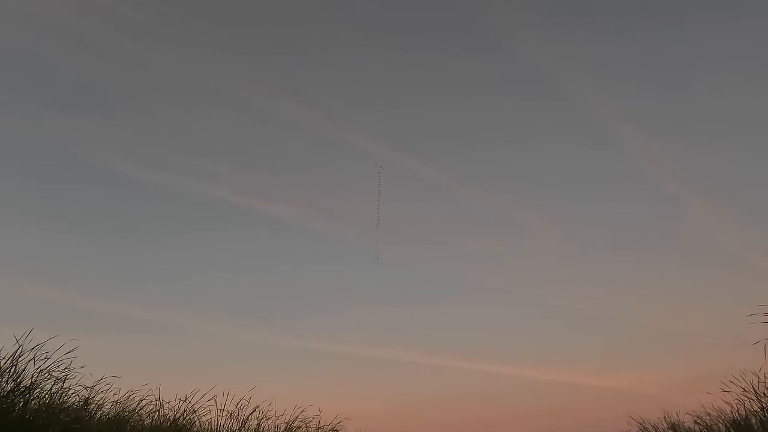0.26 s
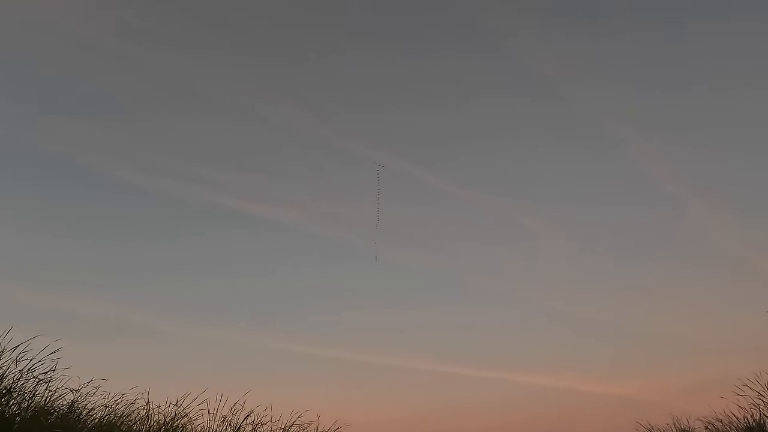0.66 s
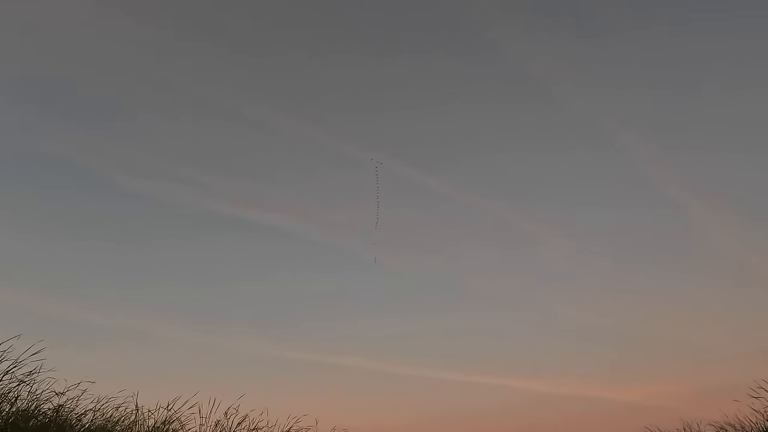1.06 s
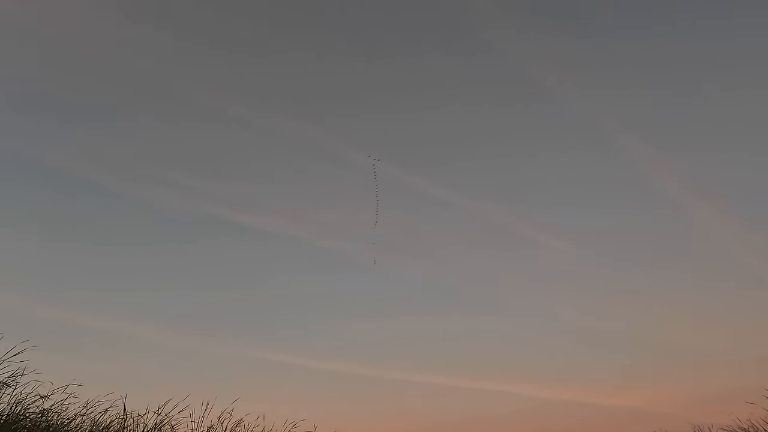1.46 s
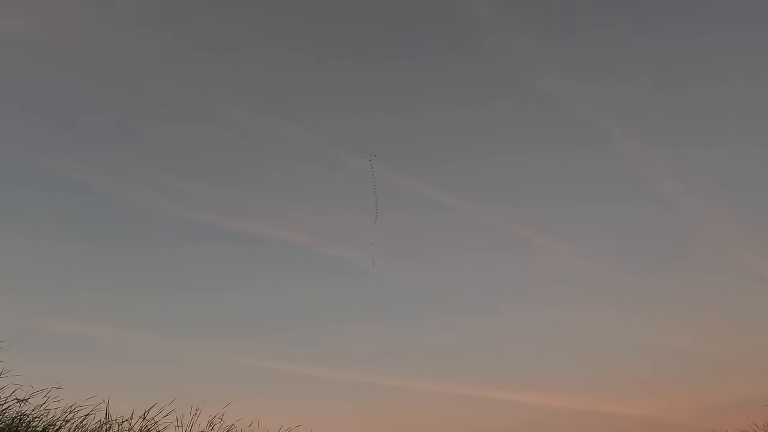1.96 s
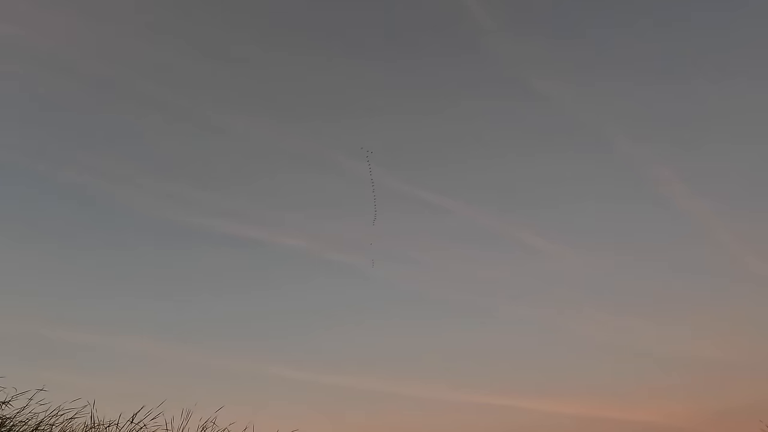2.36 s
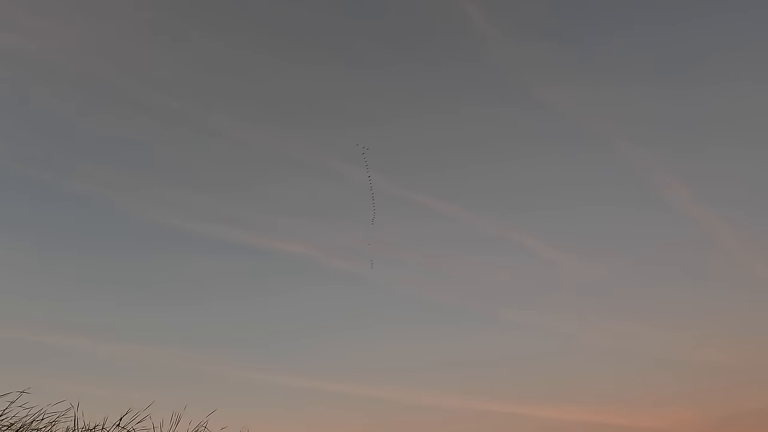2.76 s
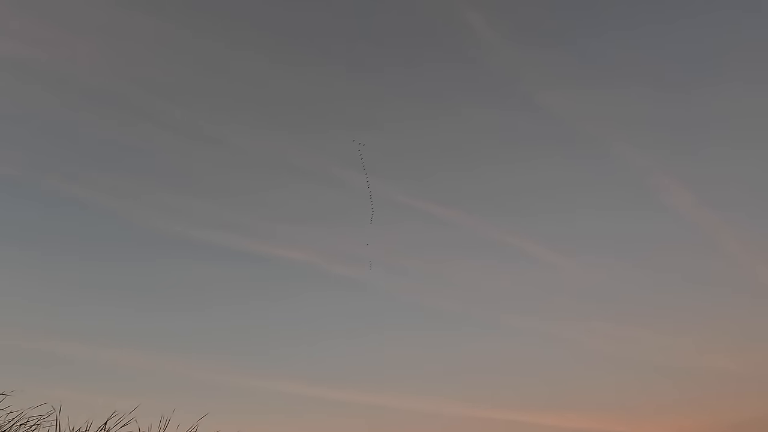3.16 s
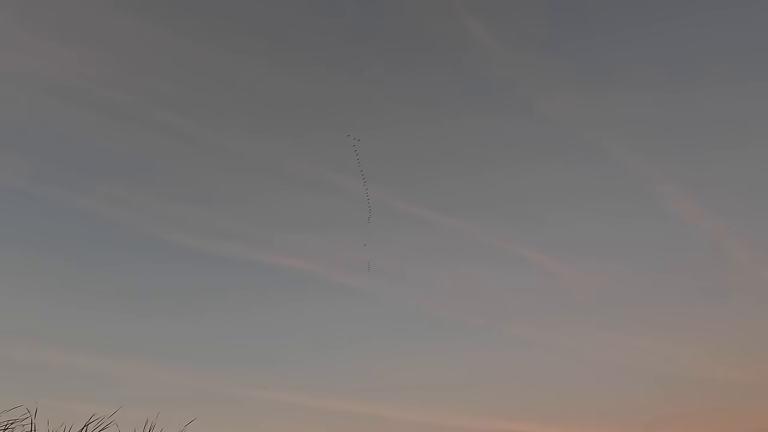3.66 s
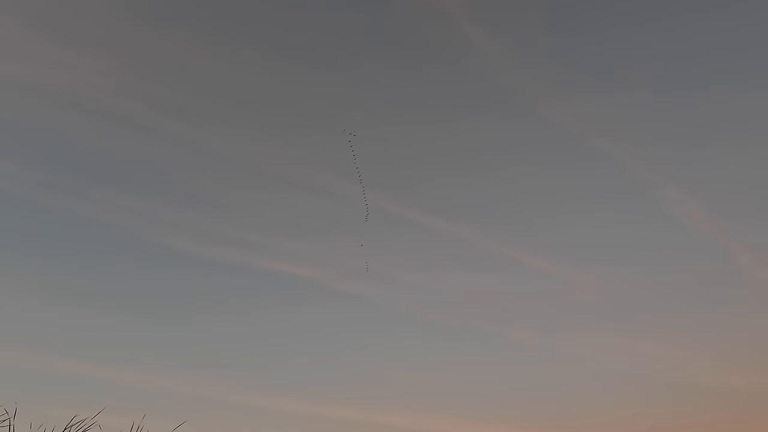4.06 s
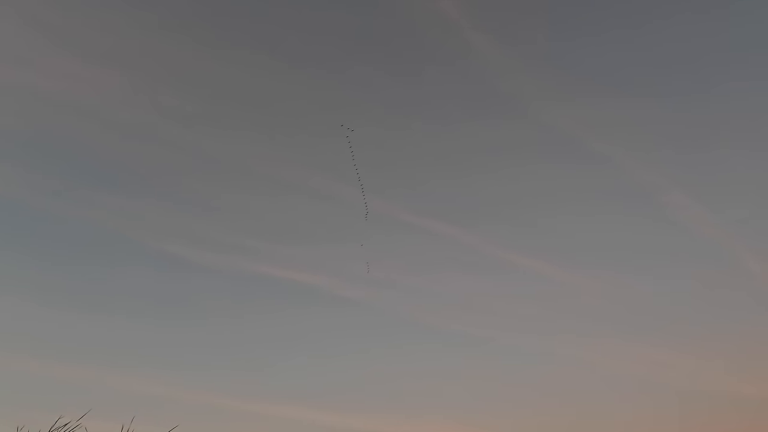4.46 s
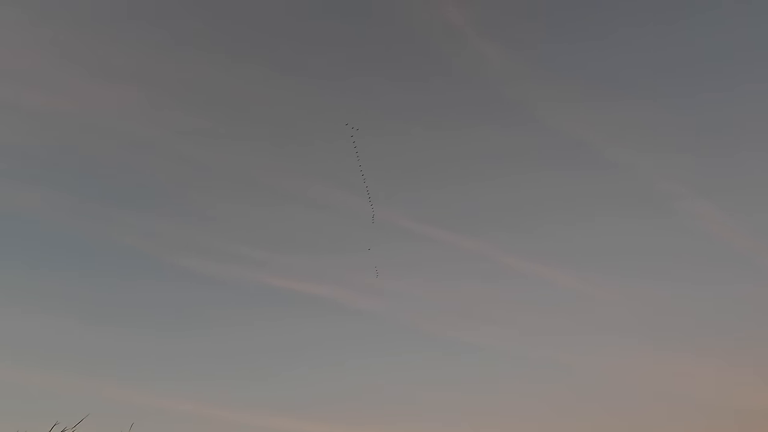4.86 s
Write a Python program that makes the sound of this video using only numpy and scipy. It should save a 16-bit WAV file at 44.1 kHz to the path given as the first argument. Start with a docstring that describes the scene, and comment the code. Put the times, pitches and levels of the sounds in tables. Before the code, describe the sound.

Short, raspy goose honks pass overhead, over a steady wind rumble, soft reed hiss and faraway cackling.

```python
"""Geese pass high over a marsh; wind rumbles on the microphone, more on the right, over reed hiss.
From the start far birds cackle and grass stems tick. Near 0.5 s one goose begins four honks, a second
apart, each cracking at its top; gusts slap the microphone until 0.8 s. Then other geese overlap, each
syrinx breaking from a rasp into a clear arched note and back. From 2 s they honk singly, and near 4.5 s
two overlap. Far cackles and wind end the scene."""
import sys
import numpy as np
from scipy import signal
from scipy.fft import rfft, irfft, next_fast_len
from scipy.io import wavfile
from scipy.ndimage import uniform_filter1d

SR = 44100
rng = np.random.default_rng(int(sys.argv[2]) if len(sys.argv) > 2 else 0)


def unload_audio(sound):
    """Save the sound as a 16-bit wav file, at the path given as the first command line argument."""
    columns = np.transpose(np.atleast_2d(sound))
    # keep every value between -1 and 1, then stretch to whole-number steps
    steps = np.round(np.clip(columns, -1, 1) * 32767)
    wavfile.write(sys.argv[1], SR, steps.astype(np.int16))


N = 224557
TIME = np.arange(N) / SR

NOTE_ATTACK_S, NOTE_RELEASE_S = 0.019, 0.044
RASP_JOIN_S, RASP_EDGE_S = 0.016, 0.028  # slopes: note side, outer end
OPEN_FADE_DB, CLOSE_FADE_DB = 8.5, 5.5  # rasp's drop away from the note
LOCK_S = 0.006  # catch to note

ARCH_POWER = 1.8  # 2 = parabola
FIRST_DB_PER_HZ, OCTAVE_DB_PER_HZ = 0.13, 0.05  # loss below top pitch
FIRST_GROWTH_DB_PER_S, RASP_SAG_HZ_PER_S = 34.5, 875
CATCH_OPEN_DB, CATCH_CLOSE_DB = -3.5, -1  # re rasp
# Smooth honks: (start [s], rise [s], fall [s], first pitch [Hz], top pitch [Hz], last pitch [Hz],
# fundamental [dB], octave [dB], brightness [dB], tilt [dB/harmonic], opening rasp [s], opening rasp [dB],
# rasp under note [dB], closing rasp [s], closing rasp [dB])
ARCHED_HONKS = [ (.806, 0.036, 0.02, 760, 942, 942, -64, -51.5, 0, -1, 0.0174, -64, -67.5, 0.079, -59),
                (.895, 0.0285, .033, 790, 850, 781, -64.5, -56.5, -8, -2.5, .01, -76, -66, 0.012, -77),
                (.932, 0.037, 0.061, 887, 983.6, 887, -61, -51, 1, -0.5, 0.047, -58.5, -70, 0.025, -55.5),
                (1.052, 0.044, 0.028, 940, 963.6, 954.4, -52.5, -54.5, 0.5, 1, 0.022, -50.5, -48.5, 0.061, -53.5),
                (1.06, .088, .066, 825, 934, 829, -54.5, -50, 2.5, -1, .02, -62.5, -60, .016, -79),
                (2.174, 0.017, .023, 905, 954.7, 914, -58.5, -54, 5.5, -7.5, 0.028, -58.5, -66, .01, -77),
                (2.667, 0.048, 0.039, 940, 977.5, 973, -70, -51.5, -5, -6, 0.053, -61.5, -77, 0.076, -59),
                (3.138, 0.0574, 0.057, 907, 922, 848, -49.5, -48, 1.5, 0.23, .04, -58.5, -70.5, 0.02, -70),
                (4.107, 0.041, 0.046, 941, 996, 943, -57.5, -55.5, 7.5, -12, .054, -61.5, -63.5, 0.073, -60),
                (4.39, 0.043, 0.068, 832, 992.5, 837, -50.5, -48, 0.5, 1, 0.048, -59, -65.5, .03, -59),
                (4.468, 0.052, 0.066, 939, 982, 853, -44.5, -49.5, -6, 1.06, .014, -49, -70, 0.034, -76)]


def arched_honks():
    """Each note breaks out of a rasp, arches in pitch and level, and falls back into a rasp."""
    out = np.zeros(N)
    for (start, rise, fall, first_hz, top_hz, last_hz, first_db, octave_db, bright_db, tilt_db,
         open_s, open_db, under_db, close_s, close_db) in ARCHED_HONKS:
        top, end = start + rise, start + rise + fall
        span = call_span(start - open_s, end + close_s)
        t = TIME[span]
        before = np.clip((top - t) / rise, 0, 1.1)
        after = np.clip((t - top) / fall, 0, 1.1)
        droop_hz = (top_hz - first_hz) * before ** ARCH_POWER + (top_hz - last_hz) * after ** ARCH_POWER
        outside_s = np.abs(t - np.clip(t, start, end))
        hz = top_hz - droop_hz - RASP_SAG_HZ_PER_S * outside_s
        clear = gate(t, start, end, NOTE_ATTACK_S, NOTE_RELEASE_S)
        first = clear * undb(first_db - FIRST_DB_PER_HZ * droop_hz + FIRST_GROWTH_DB_PER_S * (t - top))
        octave = clear * undb(octave_db - OCTAVE_DB_PER_HZ * droop_hz)
        opening = rasp_envelope(t, start, start - open_s, open_db, OPEN_FADE_DB)
        closing = rasp_envelope(t, end, end + close_s, close_db, CLOSE_FADE_DB)
        hoarse = opening + clear * undb(under_db) + closing
        out[span] += syrinx(t, hz, first, octave, hoarse, bright_db, tilt_db)
        out[span] += catch(t, start - LOCK_S, open_db + CATCH_OPEN_DB)
        out[span] += catch(t, end + LOCK_S, close_db + CATCH_CLOSE_DB)
    return out


CLIMB_HZ_PER_S, SAG_HZ_PER_S = 780, 1500
CRACK_DROP_HZ, CRACK_S = 50.5, 0.014
SWELL_SIGMA_S, SWELL_LEAD_S, OCTAVE_DIP_DB = 0.016, 0.004, 2
CRACK_BRIGHT_DB, CRACK_TILT_DB = 3, 2
CRACK_OPEN_S, CRACK_OPEN_DB, CRACK_UNDER_DB, CRACK_CLOSE_S = 0.024, -61, -79.5, 0.034  # rasps
# One goose's cracking honks: (catch time [s], climb [s], sag [s], top pitch [Hz], fundamental [dB],
# its swell [dB], its gain after crack [dB], octave [dB], brightness [dB], catch [dB], closing rasp [dB])
CRACKED_HONKS = [(0.457, 0.071, 0.048, 987.9, -64, -1.5, 7, -54.5, -8.5, -52.5, -72),
                 (1.403, 0.073, 0.058, 991.5, -63.5, 10.5, 4.5, -53.5, -10.5, -51.5, -66),
                 (2.376, .072, 0.062, 984, -60, 10.5, -4, -56, -8, -52, -67.5),
                 (3.336, 0.079, 0.058, 984.5, -56.5, 9, -3, -54.5, -7.5, -51.5, -61.5)]


def cracked_honks():
    """Pitch climbs, the fundamental swells; the voice cracks lower and brighter, then sags to a rasp."""
    out = np.zeros(N)
    for (at, climb, sag, top_hz, first_db, swell_db, after_db,
         octave_db, bright_db, catch_db, close_db) in CRACKED_HONKS:
        start, crack, end = at + LOCK_S, at + climb, at + climb + sag
        span = call_span(start - CRACK_OPEN_S, end + RASP_EDGE_S)
        t = TIME[span]
        cracked = np.clip((t - crack) / CRACK_S, 0, 1)
        hz = top_hz - CLIMB_HZ_PER_S * np.maximum(crack - t, 0) - CRACK_DROP_HZ * cracked
        hz -= SAG_HZ_PER_S * np.maximum(t - crack - CRACK_S, 0)
        swell = bell(t, crack - SWELL_LEAD_S, SWELL_SIGMA_S)
        clear = gate(t, start, end, NOTE_ATTACK_S, NOTE_RELEASE_S)
        first = clear * undb(first_db + swell_db * swell + after_db * cracked)
        octave = clear * undb(octave_db - OCTAVE_DIP_DB * swell)
        opening = rasp_envelope(t, start, start - CRACK_OPEN_S, CRACK_OPEN_DB, OPEN_FADE_DB)
        closing = undb(close_db) * gate(t, end - CRACK_CLOSE_S, end + LOCK_S, RASP_EDGE_S, RASP_EDGE_S)
        hoarse = opening + clear * undb(CRACK_UNDER_DB) + closing
        overtones_db = bright_db + CRACK_BRIGHT_DB * cracked
        out[span] += syrinx(t, hz, first, octave, hoarse, overtones_db, CRACK_TILT_DB)
        out[span] += catch(t, at, catch_db)
    return out


CLEAR_JITTER, HOARSE_JITTER = 0.0058, 0.014  # share of pitch
# Upper throat resonances: (frequency [Hz], gain [dB])
UPPER_THROAT = [(2500, -32.5), (2800, -23.5), (3000, -32), (3400, -35.5), (3700, -26.5), (3950, -33.5),
                (4300, -35), (4650, -31.5), (5000, -35), (5550, -38.5), (6000, -47)]


def syrinx(t, hz, first, octave, hoarse, bright_db, tilt_db):
    """A harmonic note that brightens with effort, plus the rasp that shakes its pitch."""
    effort = np.hypot(first, octave)
    roughness = hoarse / (hoarse + effort + 1e-9)
    jitter = (CLEAR_JITTER + HOARSE_JITTER * roughness) * walk(t, 330)
    phase = cycles(hz * (1 + jitter))
    note = first * np.sin(phase) + octave * np.sin(2 * phase)
    bright = undb(bright_db) * effort * (effort / undb(-44)) ** 0.053
    for step, harmonic in enumerate(range(3, 7)):
        db = np.interp(harmonic * hz, *np.transpose(UPPER_THROAT)) + step * tilt_db
        note += bright * undb(db + 4 * walk(t, 45)) * np.sin(harmonic * phase)
    shimmer = undb(1.2 * walk(t, 140))
    return np.sqrt(2) * note * shimmer + hoarse * rasp(t, hz)


RASP_JITTER, RASP_AIR_DB, RASP_FLUTTER_DB = 0.028, -9, 3
# Throat response to the rasp: (frequency [Hz], gain [dB])
THROAT = [(400, -50), (700, -25), (920, -7), (1130, 1), (1330, -4), (1520, -9), (1700, -4), (1900, -3),
          (2130, -9), (2450, -23), (3100, -33), (4500, -35), (6000, -54), (9000, -75)]


def rasp(t, hz):
    """The syrinx beats unevenly every fifth cycle; air hisses on each beat; the throat colours both."""
    beat = cycles(hz / 5 * (1 + RASP_JITTER * walk(t, 260)))
    pulses = sum(np.cos(k * beat + rng.uniform(0, 2 * np.pi)) * undb(3 * walk(t, 70))
                 for k in range(3, 28))
    puffs = rng.standard_normal(len(t)) * (1 + np.cos(beat))
    return unit(unit(colour(pulses, THROAT)) + undb(RASP_AIR_DB) * unit(colour(puffs, THROAT)))


def rasp_envelope(t, near_s, far_s, db, fade_db):
    """Fluttering rasp level, strongest next to the note."""
    length_s = abs(far_s - near_s)
    away_s = (t - near_s) * np.sign(far_s - near_s)
    along = np.clip(away_s / length_s, 0, 1)
    level = undb(db - fade_db * (along - 0.5) + RASP_FLUTTER_DB * walk(t, 90))
    return level * gate(away_s, 0, length_s, RASP_JOIN_S, RASP_EDGE_S)


CATCH_HZ, CATCH_SIGMA_S, CATCH_GLIDE = 1089, 0.0072, 0.025


def catch(t, at, db):
    """At a note's edge the syrinx briefly sings at the lower throat resonance, sliding up."""
    hz = CATCH_HZ * (1 + CATCH_GLIDE * (t - at) / CATCH_SIGMA_S)
    return np.sqrt(2) * undb(db) * bell(t, at, CATCH_SIGMA_S) * np.sin(cycles(hz))


# Distant cackles: (start [s], length [s], first pitch [Hz], last pitch [Hz], tone [dB], rasp [dB])
FAR_CALLS = [(0.032, 0.017, 1507, 1650, -66, -75.5), (0.255, 0.097, 1300, 1267, -71.5, -74),
             (0.293, 0.13, 1720, 1800, -72.5, -73.5), (0.383, 0.069, 1234, 1073, -70.5, -71.5),
             (.666, 0.016, 1983, 2060, -69, -78), (0.679, 0.088, 965, 927, -70.5, -73.5),
             (0.697, .11, 777, 785.6, -78.5, -85), (1.529, 0.098, 1625, 1524, -70, -74),
             (1.616, .045, 1412, 1140, -73.5, -88), (2.08, .09, 1680, 2197, -82, -72.5),
             (2.215, 0.113, 1815, 1146, -73, -74.5), (2.51, 0.083, 1880, 1669, -69, -68.5),
             (3.268, 0.11, 1466, 1422, -69.5, -69.5), (3.489, .2, 1877, 1780, -76.5, -71),
             (3.65, 0.052, 1162, 1043, -75.5, -67), (4.605, 0.17, 1860, 1806, -80.5, -80),
             (4.701, 0.16, 1350, 1368, -67.5, -72), (4.846, 0.019, 1407, 1263, -62.5, -76),
             (4.851, .055, 1140, 1037, -76, -70), (5.059, 0.083, 1111, 1200, -78.5, -64)]


def far_birds():
    """Only the strongest partial and some rasp carry this far, on a shallow arch."""
    out = np.zeros(N)
    for start, length, first_hz, last_hz, tone_db, rasp_db in FAR_CALLS:
        span = (TIME >= start) & (TIME < start + length)
        t = TIME[span]
        along = (t - start) / length
        arch = np.abs(np.sin(np.pi * along))
        glide_hz = first_hz + (last_hz - first_hz) * along
        hz = glide_hz * (1 + 0.02 * arch + 0.035 * walk(t, 400))
        tone = np.sqrt(2) * np.sin(cycles(hz)) * undb(tone_db + 4.4 * walk(t, 70))
        cackle = undb(rasp_db) * rasp(t, 900 + 70 * arch + 40 * walk(t, 60))
        out[span] += arch ** 0.43 * (tone + cackle)
    return out


def echo(x, t60_s, wet_db):
    """Reeds and banks scatter a faint tail, different at each ear."""
    t = TIME[:SR]
    decay = np.exp(-np.log(1000) * t / t60_s) * np.clip(t / 0.03, 0, 1)
    scatter = [(500, -12), (1900, -2), (4000, -6)]
    tails = [colour(rng.standard_normal(SR), scatter) * decay for _ in range(2)]
    ears = [signal.fftconvolve(x, tail / np.sqrt(np.sum(tail ** 2)))[:N] for tail in tails]
    return undb(wet_db) * np.array(ears)


BREEZE_GAIN_DB, BREEZE_FLUTTER_DB = 3.5, 0.93
# Breeze before gain: (time [s], level [dB])
BREEZE_LEVELS = [(0.0, -40), (0.21, -46.5), (0.47, -41.5), (0.64, -41.5), (0.95, -42), (1.12, -48),
                 (2.03, -44.5), (2.23, -47.5), (2.82, -45.5), (2.96, -44.5), (4.59, -46.5), (5.09, -43)]
# Soft swells: (time [s], sigma [s], level [dB])
BREEZE_SWELLS = [(.15, 0.041, -31.5), (1.389, .06, -36), (1.691, 0.033, -39), (1.85, 0.022, -28),
                 (2.211, 0.015, -32), (2.381, 0.016, -34.5), (2.985, 0.0071, -33), (3.42, 0.026, -36),
                 (3.702, .03, -33), (3.879, 0.013, -35.5), (4.64, 0.012, -32.5), (5.08, 0.02, -34.5)]
# Turbulence spectrum: (frequency [Hz], gain [dB])
BREEZE_SPECTRUM = [(8, -11.5), (18, 12.5), (30, -1.5), (45, 0), (60, -17), (80, -28.5), (110, -30.5),
                   (200, -43), (400, -66), (900, -84), (3000, -120)]


def breeze():
    """Turbulence rumbles on the microphone and swells now and then."""
    eddies = noise(BREEZE_SPECTRUM)
    eddies /= np.sqrt(uniform_filter1d(eddies ** 2, SR // 8))  # level out over 1/8 s
    base_db = np.interp(TIME, *np.transpose(BREEZE_LEVELS)) + BREEZE_GAIN_DB
    base = undb(base_db + BREEZE_FLUTTER_DB * walk(TIME, 18))
    swells = sum(undb(db) * bell(TIME, at, sigma_s) for at, sigma_s, db in BREEZE_SWELLS)
    return eddies * np.hypot(base, swells)


# Gusts: (time [s], sigma [s], level [dB])
GUSTS = [(.459, 0.015, -27.5), (0.614, .014, -22.5), (0.645, 0.0058, -31), (0.736, 0.01, -37),
         (0.794, 0.015, -27)]
# Gust spectrum: (frequency [Hz], gain [dB])
GUST_SPECTRUM = [(15, -16.5), (35, 15.5), (60, 5), (90, -3), (140, -8), (200, -31), (350, -59.5),
                 (800, -77.5), (3000, -120)]


def gusts():
    """Short gusts slap the microphone, reaching higher in frequency than the breeze."""
    out = np.zeros(N)
    for at, sigma_s, db in GUSTS:
        envelope = bell(TIME, at, sigma_s)
        slap = noise(GUST_SPECTRUM) * envelope
        out += undb(db) * slap * np.sqrt(np.sum(envelope ** 2) / np.sum(slap ** 2))
    return out


# Stem ticks: (time [s], ring [Hz], peak [dB])
STEM_TICKS = [(0.274, 11400, -71), (.315, 10700, -82), (0.439, 9300, -78), (0.528, 6270, -65),
              (.94, 10000, -81), (1.178, 12100, -79), (3.247, 11900, -83)]


def grass():
    """Dry stems touch: a few milliseconds of high, narrow noise each."""
    out, t = np.zeros(N + SR), TIME[:SR // 20]
    for at, hz, db in STEM_TICKS:
        snap = rng.standard_normal(len(t)) * np.exp(-t / 0.0026)
        tick = colour(snap, [(0.57 * hz, -40), (0.86 * hz, 0), (1.05 * hz, 0), (1.5 * hz, -40)])
        start = int(at * SR)
        out[start:start + len(t)] += undb(db) * tick / np.abs(tick).max()
    return out[:N]


MARSH_DB, MARSH_SWAY_DB = -68, 0.5
# Air and reeds, far flock as a 1-2 kHz hump: (frequency [Hz], gain [dB])
MARSH_SPECTRUM = [(40, -13.5), (110, -1), (210, -1.5), (320, -10.5), (500, -13.5), (780, -17), (1150, -13),
                  (1900, -19), (2500, -26.5), (3800, -31.5), (6000, -30.5), (7400, -34), (8800, -47.5),
                  (12400, -47)]
# Stereo width: (frequency [Hz], side re mid [dB])
MARSH_WIDTH = [(100, -8), (300, -1.5), (1200, -1.5), (3000, -2), (8000, -3)]


def marsh():
    """Wide air and reed hiss, swaying slightly; the lows lean right."""
    mid = noise(MARSH_SPECTRUM)
    side = colour(noise(MARSH_SPECTRUM), MARSH_WIDTH)
    left = colour(mid - side, [(300, -5), (700, -1.5), (3000, -0.2)])
    right = colour(mid + side, [(300, 2.5), (700, 0.8), (3000, 0.2)])
    return np.array([left, right]) * undb(MARSH_DB + MARSH_SWAY_DB * walk(TIME, 9.6))


def undb(db):
    """Decibels to gain."""
    return 10 ** (np.asarray(db) / 20)


def unit(x):
    """Scale to rms 1."""
    return x / np.sqrt(np.mean(x ** 2))


def colour(x, points):
    """Filter by (frequency [Hz], gain [dB]) points."""
    hz, db = np.transpose(points)
    size = next_fast_len(len(x) + 2048)
    bins_hz = np.maximum(np.arange(size // 2 + 1) * SR / size, 1)
    gain = undb(np.interp(np.log(bins_hz), np.log(hz), db))
    return irfft(rfft(x, size) * gain, size)[:len(x)]


def noise(points):
    """Coloured noise, rms 1."""
    return unit(colour(rng.standard_normal(N), points))


def walk(t, rate_hz):
    """Random wander, spread near 1."""
    knots = rng.standard_normal(4096)
    return 1.2 * np.interp((t - t[0]) * rate_hz, np.arange(len(knots)), knots)


def pan(x, balance_db):
    """Place by left minus right level."""
    gain = np.sqrt(undb(balance_db))
    return np.array([x * gain, x / gain])


def cycles(hz):
    """Phase [rad] of a moving pitch."""
    return 2 * np.pi * np.cumsum(hz) / SR


def bell(t, at, sigma_s):
    """Gaussian envelope, peak 1."""
    return np.exp(-0.5 * ((t - at) / sigma_s) ** 2)


def gate(t, start, end, attack_s, release_s):
    """Smooth gate, slopes centred on start and end."""
    opening = np.clip(np.minimum((t - start) / attack_s, (end - t) / release_s) + 0.5, 0, 1)
    return np.sin(np.pi / 2 * opening) ** 2


def call_span(start, end):
    """Sample mask of one call and its slopes."""
    return (TIME > start - RASP_EDGE_S) & (TIME < end + RASP_EDGE_S)


def scene():
    """Flock, echo, wind, grass and marsh."""
    flock = arched_honks() + cracked_honks() + far_birds()
    direct = pan(flock, balance_db=-1.6)
    direct[0] = np.interp(TIME - 3.5e-5, TIME, direct[0])  # reaches the left ear later
    tail = echo(flock, t60_s=0.41, wet_db=-18.5)
    wind = pan(breeze() + gusts(), balance_db=-6.1)
    return direct + tail + wind + pan(grass(), balance_db=-1.5) + marsh()


OVERLOAD_PEAK, LOWPASS_HZ = 0.115, 12400


def record(dry):
    """The microphone rounds off the strongest gusts; the recorder cuts the top."""
    rounded = dry / (1 + (dry / OVERLOAD_PEAK) ** 4) ** 0.25
    lowpass = signal.ellip(8, 0.2, 70, LOWPASS_HZ, fs=SR, output="sos")
    return signal.sosfilt(lowpass, rounded)


dry = scene()
out = record(dry)
unload_audio(out)
```